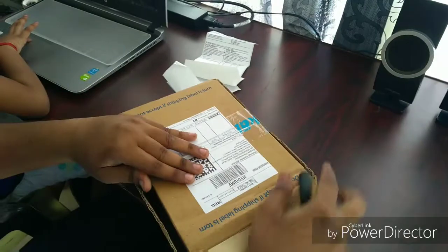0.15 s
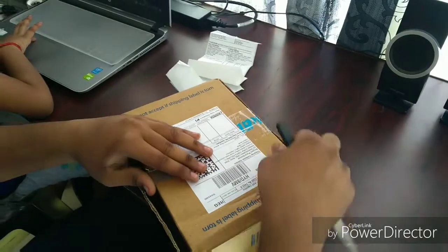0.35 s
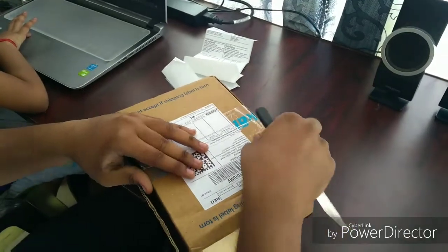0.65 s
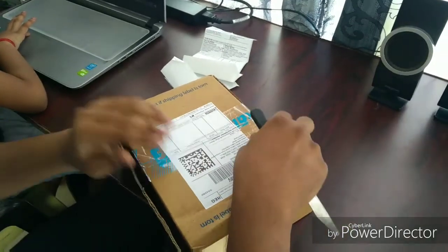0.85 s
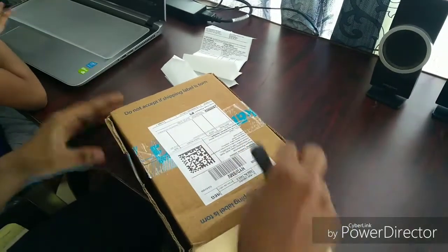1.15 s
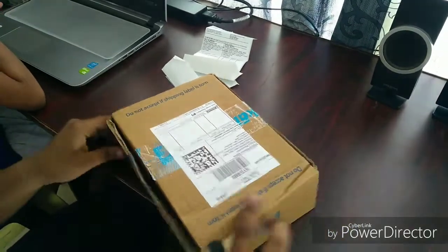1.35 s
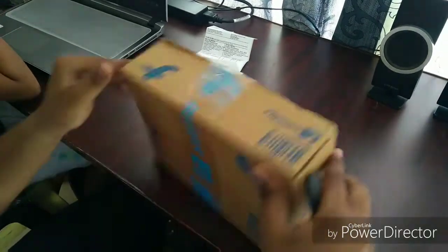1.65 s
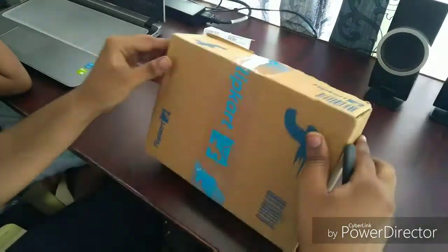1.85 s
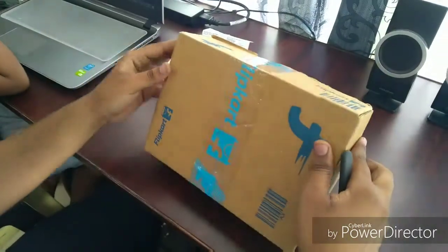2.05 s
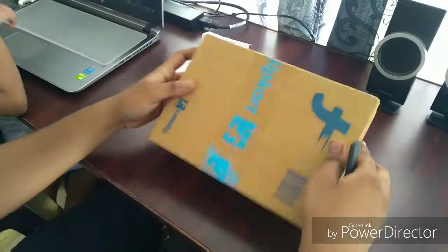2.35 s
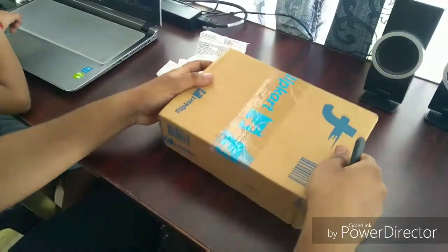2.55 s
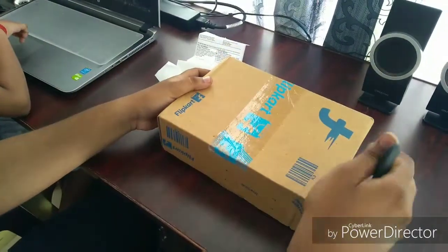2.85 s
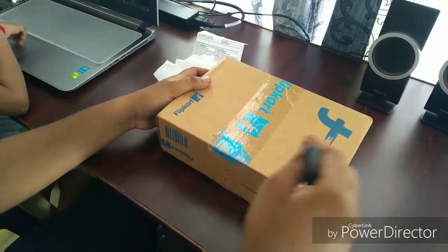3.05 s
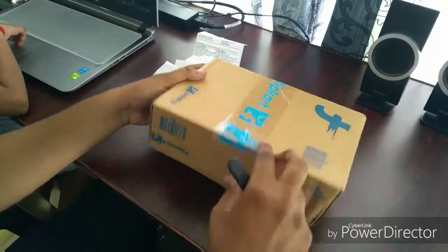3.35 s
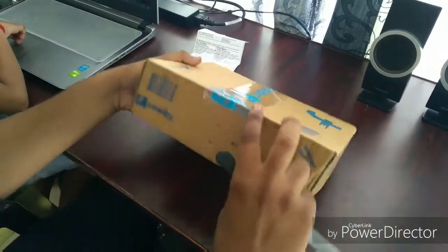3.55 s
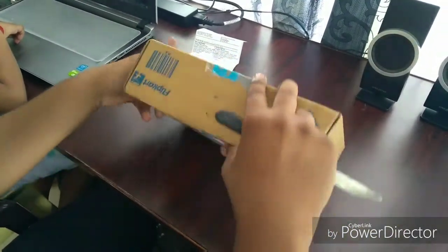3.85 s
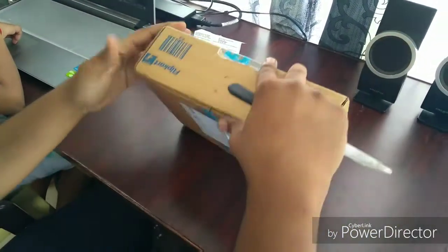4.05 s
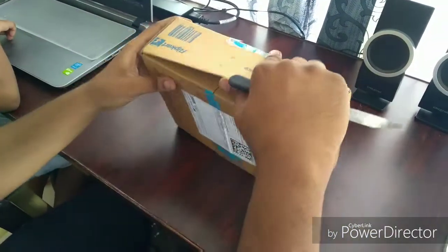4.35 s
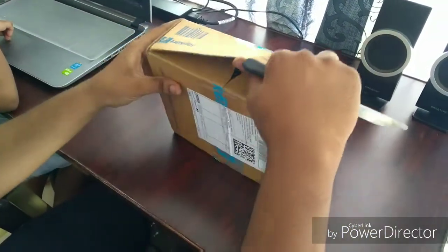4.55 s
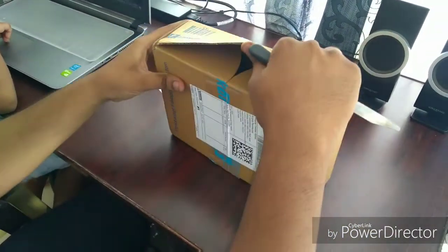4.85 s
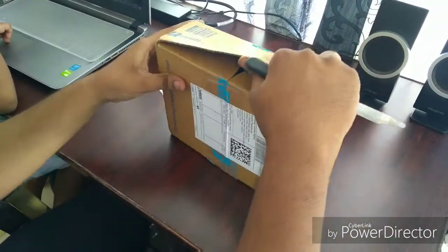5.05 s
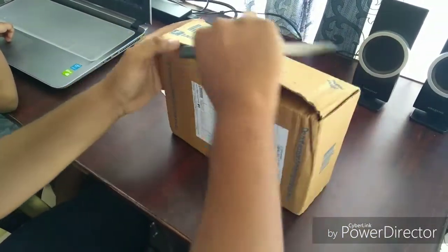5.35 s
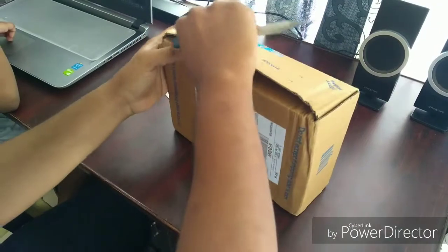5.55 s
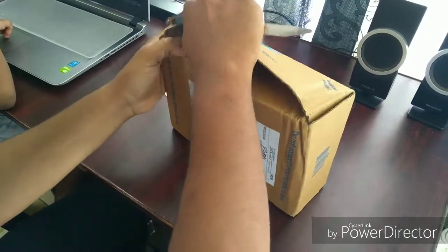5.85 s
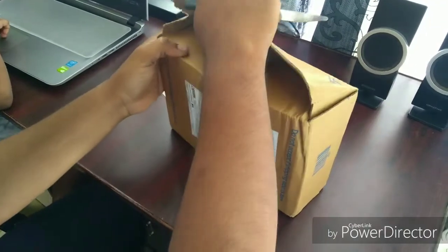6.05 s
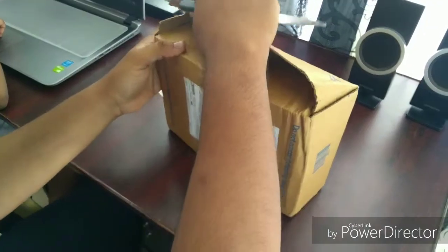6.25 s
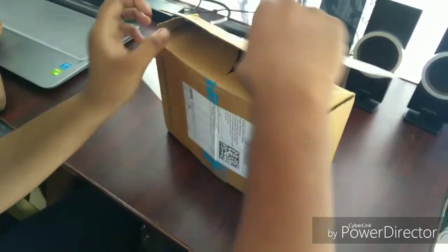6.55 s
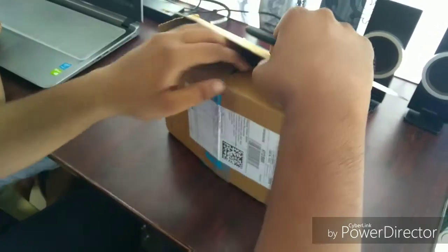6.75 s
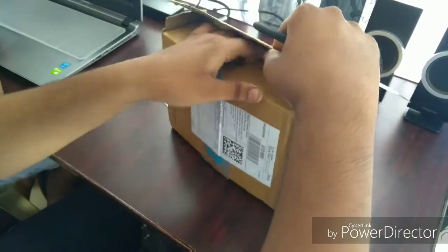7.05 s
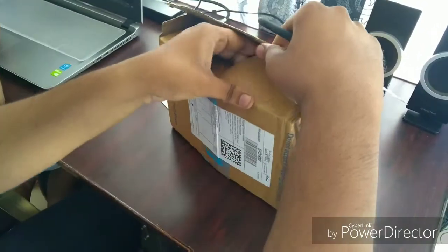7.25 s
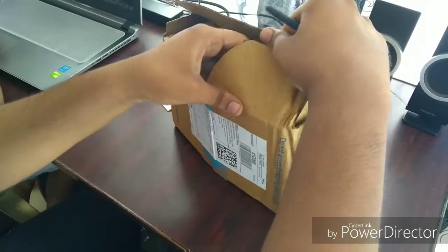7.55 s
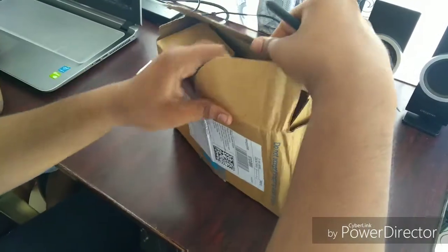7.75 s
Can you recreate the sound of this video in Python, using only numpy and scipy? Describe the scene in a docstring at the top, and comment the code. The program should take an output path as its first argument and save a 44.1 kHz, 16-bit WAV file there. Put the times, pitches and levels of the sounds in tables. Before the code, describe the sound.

Hands rub, slide and set down a cardboard box, then its taped flaps snap and crackle open over a low room hum.

```python
"""A cardboard box is handled on a table in a small room, over a steady low hum. Hands rub and slide it,
friction hissing on the paper and rumbling in the walls; near 1.6 s it is set down and its modes ring.
A faint whistle passes at 3.1 s. The rubbing resumes, and glued flaps and tape snap loose near 4.6 s
and 6 s. A soft push at 6.9 s leads to a hard, crackling pull and a last snap.
Throughout, the right microphone port favours one band of treble."""
import sys
import numpy as np
from scipy import signal
from scipy.fft import rfft, irfft, next_fast_len
from scipy.io import wavfile
from scipy.ndimage import uniform_filter1d, map_coordinates

SR = 44100
rng = np.random.default_rng(int(sys.argv[2]) if len(sys.argv) > 2 else 0)


def to_wav(s):
    """Save 16-bit WAV."""
    ch = np.atleast_2d(s).T  # columns
    pcm = np.round(np.clip(ch, -1, 1) * 32767)  # PCM
    wavfile.write(sys.argv[1], SR, pcm.astype(np.int16))


N = 347949

# Normal modes of the hollow box: mode_hz, relative_db, t60_s
BOX_MODES = [(89, -1, .2), (127, -0.5, 0.26), (151.7, 7.5, 0.28), (188, -13.5, 0.097), (241.6, 8, 0.153),
             (297.6, 4.5, 0.17), (348, 3, 0.12), (413, -11, 0.057), (450.7, 2.5, 0.17),
             (492.8, 7.5, 0.1247), (529.3, 6, 0.07), (628, -3, 0.13), (796, 1, .12), (831, -2, 0.018)]


def amp(db):
    return 10 ** (np.asarray(db) / 20)


def unit_rms(x):
    return x / np.sqrt(np.mean(x ** 2) + 1e-20)


def along(points, hz):
    """Interpolation of (frequency, value) points on a logarithmic frequency axis."""
    point_hz, values = np.transpose(points)
    return np.interp(np.log(hz + 1), np.log(point_hz + 1), values)


def wobble(knots_per_s):
    """Spline interpolation of Gaussian knots gives a smooth random curve."""
    knots = rng.standard_normal(int(N * knots_per_s / SR) + 4)
    return map_coordinates(knots, [np.arange(N) * knots_per_s / SR])


def filtered(x, response):
    """Linear filtering: the spectrum is multiplied by a complex frequency response."""
    size = next_fast_len(N + SR // 2)
    return irfft(rfft(x, size) * response(np.fft.rfftfreq(size, 1 / SR)), size)[..., :N]


def textured_noise(spectrum, patchy_db, grit_db=0):
    """Random modulation gives stereo noise of rms 1 grit in time and patches of colour."""
    # Likeness of left and right: frequency_hz, coherence
    coherence = [(60, 0.83), (300, 0.76), (700, 0.71), (1400, 0.27), (3000, 0.0017)]
    grains = rng.standard_normal((2, N)) * amp(grit_db * wobble(700))
    cells = signal.stft(grains, nperseg=512)[2]
    patches = uniform_filter1d(rng.standard_normal(cells.shape[1:]), 6, axis=0)
    patches = unit_rms(uniform_filter1d(patches, 8, axis=1))
    pair = signal.istft(cells * amp(patchy_db * patches), nperseg=512)[1][:, :N]

    def mid_side_gains(hz):
        angle = np.arccos(np.clip(along(coherence, hz), -1, 1)) / 2
        return amp(along(spectrum, hz)) * [np.cos(angle), np.sin(angle)]

    mid, side = filtered(pair, mid_side_gains)
    return unit_rms(np.array([mid + side, mid - side]))


def hum():
    """Background noise, strongest in the bass, wavers under slow amplitude modulation."""
    # Spectrum of the hum: frequency_hz, relative_db
    spectrum = [(25, -12), (127, 1), (240, 2.5), (350, -4), (600, -14), (900, -14.5), (1300, -38),
                (2200, -37.5), (5500, -50), (6100, -24.5), (6700, -15.5), (7600, -63.5), (16000, -54)]
    return amp(-64 + 1.14 * wobble(6.5)) * textured_noise(spectrum, patchy_db=2, grit_db=2.5)


def whistle():
    """Narrow-band noise is heard as a pitch; it swells and fades in a Gaussian envelope."""
    peak_s, spread_s, pitch_hz, width_hz, level_db = 3.09, 0.07, 1950, 45, -88
    band = filtered(rng.standard_normal(N), lambda hz: np.exp(-0.5 * ((hz - pitch_hz) / width_hz) ** 2))
    t = np.arange(N) / SR - peak_s
    return amp(level_db) * np.exp(-0.5 * (t / spread_s) ** 2) * unit_rms(band)


def room(x):
    """Reverberation: each block is convolved with a new noise tail whose decay depends on frequency."""
    # Reverberation time of the small room: frequency_hz, t60_s
    decay_times = [(150, 0.3), (1000, 0.11), (5000, 0.21), (12000, 0.1)]
    block, delay_samples = SR // 3, 350
    reverb = np.zeros((2, N + SR))
    for start in range(0, N, block):
        hz, t, cells = signal.stft(rng.standard_normal((2, SR // 3)), SR, nperseg=256)
        decay = amp(-60 * t / along(decay_times, hz)[:, None])
        tail = signal.istft(cells * decay, SR, nperseg=256)[1]
        wet = signal.fftconvolve(x[:, start:start + block], tail / np.linalg.norm(tail[0]), axes=1)
        arrival = start + delay_samples
        reverb[:, arrival:arrival + wet.shape[1]] += wet
    return reverb[:, :N]


def wall_push():
    """A smooth force lacks high frequencies: a soft push sounds only the side wall's low note."""
    peak_s, spread_s, pitch_hz, level_db = 6.912, 0.016, 112, -38.5
    t = np.arange(N) / SR - peak_s
    return amp(level_db) * np.exp(-0.5 * (t / spread_s) ** 2) * np.sin(2 * np.pi * pitch_hz * t)


def stroke_levels():
    """Incoherent strokes add in power, giving the hiss, scrape and rumble envelopes in dB."""
    # Strokes and pulls of the hands: peak_s, rise_s, fall_s, hiss_db, scrape_db, rumble_db
    strokes = [(.094, 0.2, 0.25, -50, -54, -46.5), (.25, 0.058, 0.076, -71.5, -55, -47),
               (.394, 0.026, .07, -57.5, -69, -54.5), (.63, 0.02, .03, -74, -103, -63),
               (.68, 0.019, 0.027, -61, -69, -54), (.776, 0.12, 0.25, -64, -72, -62),
               (.93, 0.18, 0.11, -58, -76, -59), (1.116, 0.038, 0.059, -68.5, -95, -64.5),
               (1.41, 0.013, 0.033, -60.5, -90, -69), (1.488, 0.049, 0.045, -43.5, -47.5, -41.5),
               (1.56, 0.086, 0.22, -45.5, -53.5, -43.5), (1.66, 0.19, 0.074, -63, -60.5, -42.5),
               (1.74, 0.07, 0.18, -46.5, -67, -61), (1.82, 0.12, 0.16, -49, -56, -45),
               (1.901, 0.08, 0.2, -56, -61, -59), (2.22, 0.052, 0.23, -68, -76, -62.5),
               (2.3, 0.046, 0.13, -58.5, -91, -77), (2.432, 0.087, 0.29, -52.5, -84, -60.5),
               (2.56, 0.16, 0.17, -51, -58.5, -59.5), (2.759, 0.025, .07, -63.5, -71, -55.5),
               (3.281, 0.016, 1, -57, -70, -66.5), (3.42, 0.09, 0.36, -52.5, -64, -60.5),
               (3.62, 0.24, 0.73, -45.5, -84, -84), (3.784, 0.17, 0.065, -56, -53.5, -50),
               (3.915, 0.065, 0.23, -52.5, -61, -58), (4.082, 0.031, 0.044, -74.5, -53.5, -62),
               (4.301, .07, 0.44, -53, -57, -60), (4.458, 0.22, 0.31, -44.5, -60.5, -78),
               (4.68, 0.13, 0.22, -57.5, -54, -50.5), (4.83, 0.05, 0.11, -58.5, -53.5, -62),
               (5.0, 0.17, 0.12, -54.5, -59, -55), (5.21, 0.022, 0.22, -50.5, -55.5, -53),
               (5.36, 0.083, 0.24, -50, -58.5, -58.5), (5.5, 0.38, 0.18, -48, -54.5, -54.5),
               (5.65, 0.048, 0.093, -51.5, -54.5, -47.5), (5.75, 0.086, 0.078, -52, -51.5, -65),
               (5.82, .06, .1, -56, -63, -58), (5.889, 0.038, 0.15, -35, -40, -49.5),
               (5.959, 0.065, 0.17, -44, -45, -46.5), (6.101, 0.057, 0.13, -38.5, -41.5, -45),
               (6.199, 0.15, 0.23, -61, -52, -43.5), (6.5, 0.15, 0.47, -52, -60, -68.5),
               (6.787, .012, 0.53, -52, -58, -57), (6.93, 0.16, 0.11, -53.5, -52, -54.5),
               (7.07, 0.34, .1, -58, -57, -53), (7.25, 0.19, 0.26, -50.5, -52.5, -54),
               (7.406, 0.13, 0.091, -42, -42, -46), (7.535, 0.13, 0.092, -39, -42, -41),
               (7.63, 0.077, 0.25, -39.5, -39, -42.5), (7.75, 0.076, 0.077, -37, -36.5, -40),
               (7.82, 0.077, 0.26, -51.5, -51.5, -47)]
    peak_s, rise_s, fall_s, hiss_db, scrape_db, rumble_db = np.transpose(strokes)[:, :, None]
    t = np.arange(0, N + 64, 64) / SR
    distance = np.where(t < peak_s, (peak_s - t) / rise_s, (t - peak_s) / fall_s)
    flank = distance ** 1.13  # an exponent above 1 rounds the top

    def envelope(peak_db, drop_db):
        power = np.sum(amp(peak_db - drop_db * flank) ** 2, axis=0)
        return np.interp(np.arange(N) / SR, t, 10 * np.log10(power + 1e-14))

    return envelope(hiss_db, 20), envelope(scrape_db, 20), envelope(rumble_db, 14.4)


def fibre_crackle(force):
    """Fibres tear as a Poisson process under a hard pull; each briefly raises the friction's gain."""
    tears_per_s, t60_s = 150, 0.008
    tears = (rng.random(N) < tears_per_s / SR) * rng.exponential(0.7, N)
    decay = amp(-60 * np.arange(900) / SR / t60_s)
    return 1 + force * signal.fftconvolve(tears, decay)[:N]


def wall_rumble(force):
    """Forced vibration: friction drives the box's modes, and a flap under strain loses its deep notes."""
    # Spectrum of the drive on the walls: frequency_hz, relative_db
    spectrum = [(18, -96), (30, -32.5), (81, -4.5), (283, -5.5), (355, -3), (432, -6), (639, -13),
                (711, -7), (1100, -14.5), (1430, -25), (2420, -120)]
    bandwidth_hz, taut_cutoff_hz = 30, 400

    def resonances(hz):
        damping = 1j * bandwidth_hz * hz
        return 0.97 + sum(amp(db) * damping / (mode_hz ** 2 - hz ** 2 + damping)
                          for mode_hz, db, _ in BOX_MODES)

    drive = textured_noise(spectrum, patchy_db=2.5, grit_db=-0.5)
    slack = unit_rms(filtered(drive, resonances))
    taut = filtered(slack, lambda hz: 1j * hz / (taut_cutoff_hz + 1j * hz))
    return (1 - 0.5 * force) * slack + 1.21 * force * taut


def rubbing():
    """Stick-slip friction: skin hisses on the paper face, the board scrapes and the walls rumble."""
    # Spectrum of skin on paper: frequency_hz, relative_db
    hiss_spectrum = [(1180, -16.5), (2000, -15), (3200, -12.5), (3460, -11), (4300, -8.5), (5630, -6),
                     (6640, 1), (8480, -8.5), (13300, -15), (14700, -11.5), (16000, -50.5)]
    # Spectrum of sliding board: frequency_hz, relative_db
    scrape_spectrum = [(350, -55.5), (600, -16.5), (632, 3), (711, -9.5), (1340, 1), (1620, -6.5),
                       (1910, -2), (3500, -9), (4550, -6.5), (7700, -120)]
    hiss_db, scrape_db, rumble_db = stroke_levels()
    grip = wobble(35)  # catches and lets go
    force = np.clip((scrape_db + 58) / 18, 0, 1)  # 0 for a light stroke, 1 for a hard pull
    crackle = fibre_crackle(force)
    hiss = amp(hiss_db + 1.33 * grip) * textured_noise(hiss_spectrum, patchy_db=3, grit_db=0.5)
    scrape = amp(scrape_db + 1.97 * grip) * textured_noise(scrape_spectrum, patchy_db=2.5, grit_db=1)
    rumble = wall_rumble(force) * amp(rumble_db + 1.6 * wobble(25))
    return crackle * (hiss + scrape) + rumble


def thud(t, panel_hz):
    """Free vibration: a blow rings the damped modes, favouring those near the struck panel's pitch."""
    mode_hz, mode_db, t60_s = np.transpose(BOX_MODES)[:, :, None]
    octaves = np.log2(mode_hz / panel_hz)
    coupling_db = np.minimum(-14 * octaves, 15 * octaves) + rng.normal(0, 2.4, mode_hz.shape)
    phase = rng.uniform(0, 1.5, mode_hz.shape) + rng.normal(0, 0.25, (2, *mode_hz.shape))
    decay = amp(mode_db + coupling_db - 60 * t / t60_s)
    ring = np.sum(decay * np.sin(2 * np.pi * mode_hz * t + phase), axis=1)
    ring *= 1 + 1.67 * amp(-60 * t / 0.04)  # the first swing, under the blow, is the widest
    rise = 1 - np.exp(-t / 0.0017)
    return rise * ring / np.abs(ring).max()


def snaps():
    """Impulsive excitation: each snap or knock gives a bright crack, a slap of the board and a thud."""
    # Snaps and knocks: start_s, crack_db, slap_db, thud_db, panel_hz
    events = [(0.1668, -41.5, -44, -33.5, 135), (0.2236, -33, -33, -35, 163), (0.7608, -45, -54, -41, 447),
              (0.833, -43, -59, -48, 101), (0.851, -34.5, -75, -61, 291), (0.9274, -40, -64, -42.5, 238),
              (1.4523, -28, -34, -17, 470), (1.4727, -20.5, -27, -16.5, 263), (1.586, -38, -24.5, -9, 627),
              (1.594, -58.5, -48, -20, 145), (1.7628, -21, -20, -9.5, 400), (1.772, -49, -45, -15, 174),
              (1.8786, -32.5, -58, -28.5, 232), (2.349, -45, -76, -43, 240), (2.551, -33.5, -47, -46, 145),
              (2.6774, -61, -43.5, -38.5, 130), (2.762, -47, -79.5, -54.5, 148.6),
              (4.5349, -29, -65, -43.5, 237), (4.6339, -11.5, -17, -22, 315), (4.6497, -22, -53, -21, 330),
              (4.7986, -19.5, -24.5, -28, 345), (5.614, -23, -31, -37, 143), (5.8299, -26, -35.5, -39, 530),
              (5.8647, -15.5, -32.5, -37, 509), (5.883, -23, -25.5, -29, 490), (5.9418, -19, -30, -29, 531),
              (6.109, -18.5, -29, -42, 848), (6.1379, -10.5, -9.5, -4, 505), (6.2937, -31, -41, -46, 350),
              (6.794, -31.5, -40, -35, 139), (7.0812, -19.5, -44, -53, 288), (7.5436, -24.5, -43, -20, 358),
              (7.6106, -45, -25.5, -26.5, 355), (7.7695, -9, -14, -15, 335)]
    # Spectrum of the crack: frequency_hz, relative_db
    crack_spectrum = [(1180, -27), (2000, -18.5), (4120, -5.5), (5030, -11), (6530, -1), (10800, -18),
                      (13200, -16.5), (16000, -34)]
    # Spectrum of the slap: frequency_hz, relative_db
    slap_spectrum = [(410, -35), (560, -6.5), (700, -6), (926, -8.5), (1260, -3.5), (3200, -18.5),
                     (4160, -41), (7040, -120)]
    rise_s, crack_t60_s, slap_t60_s, tail_t60_s = 0.001, 0.017, 0.018, 0.17
    t = np.arange(SR // 3) / SR
    rise = (1 - np.exp(-t / rise_s)) ** 2
    slap_decay = amp(-60 * t / slap_t60_s) + amp(-20 - 60 * t / tail_t60_s)
    crack_envelope, slap_envelope, thuds = np.zeros((3, 2, N + SR))
    for start_s, crack_db, slap_db, thud_db, panel_hz in events:
        start = round(start_s * SR)
        span = slice(start, start + len(t))
        crack_envelope[:, span] += amp(crack_db - 60 * t / crack_t60_s) * rise
        slap_envelope[:, span] += amp(slap_db) * rise * slap_decay
        thuds[:, span] += amp(thud_db) * thud(t, panel_hz)
    cracks = crack_envelope[:, :N] * textured_noise(crack_spectrum, patchy_db=0.54)
    slaps = slap_envelope[:, :N] * textured_noise(slap_spectrum, patchy_db=2)
    return cracks + slaps + thuds[:, :N]


def scene():
    """Superposition of all sources; only the snaps and knocks excite the room."""
    hits = snaps()
    return hum() + rubbing() + wall_push() + whistle() + hits + amp(-12) * room(hits)


def record(dry):
    """Level and time differences separate two microphone ports; both lose deep bass and extreme treble."""
    # Imbalance of the ports: frequency_hz, left_minus_right_db
    imbalance = [(100, 0), (250, 3), (1300, 0.5), (4500, 1), (5800, -6), (6800, -11), (8200, 0), (10000, 0),
                 (15000, -1)]
    left_lead_s, low_cut_hz, top_hz = 0.00008, 40, 15800
    share = np.array([[0.5], [-0.5]])  # each port takes half of the difference

    def ports(hz):
        colour = amp(along(imbalance, hz) * share)
        timing = np.exp(2j * np.pi * hz * left_lead_s * share)
        high_pass = (1j * hz / (low_cut_hz + 1j * hz)) ** 2
        return colour * timing * high_pass * (hz < top_hz)

    return filtered(dry, ports)


dry = scene()
out = record(dry)
to_wav(out)
```